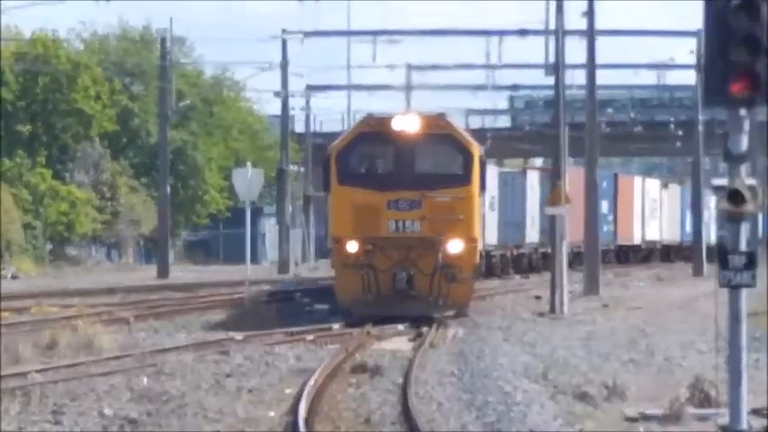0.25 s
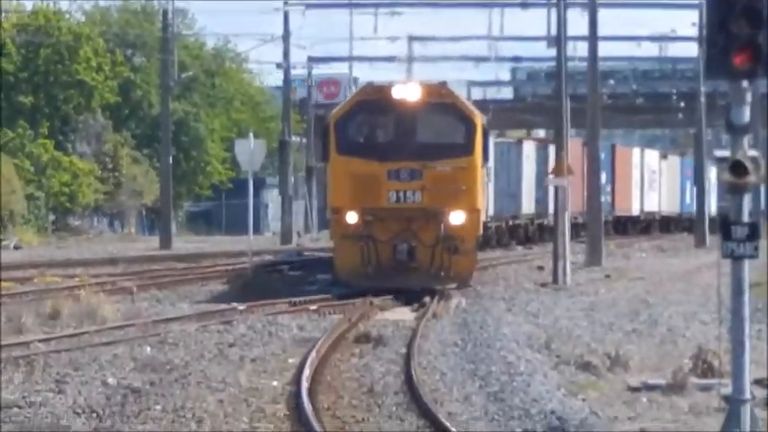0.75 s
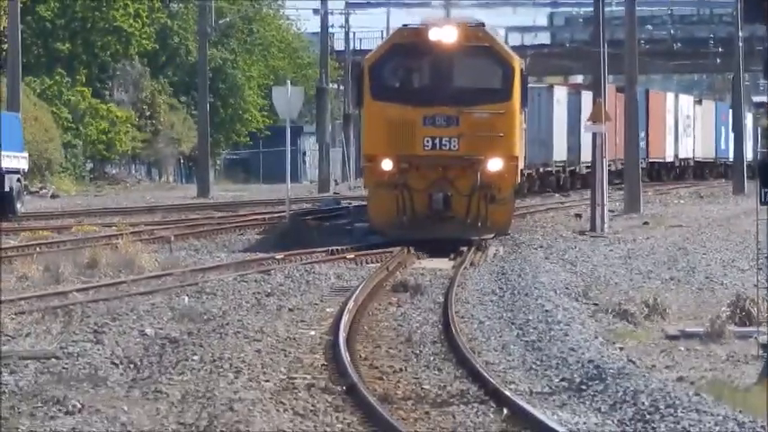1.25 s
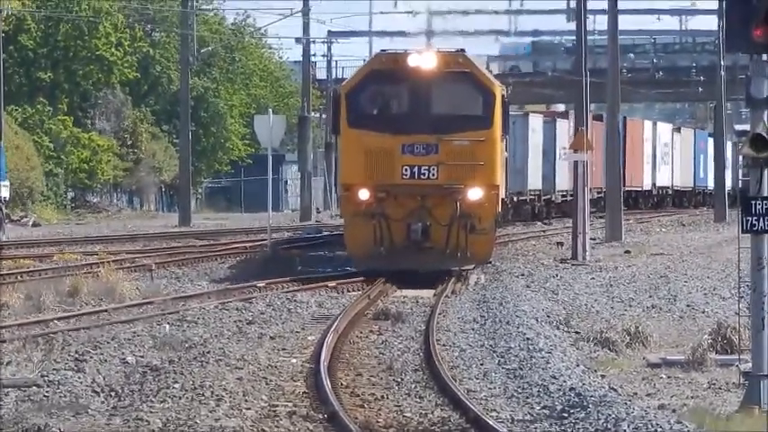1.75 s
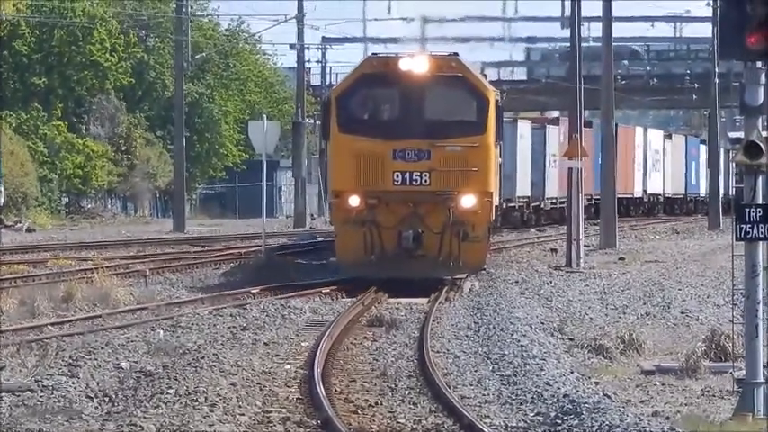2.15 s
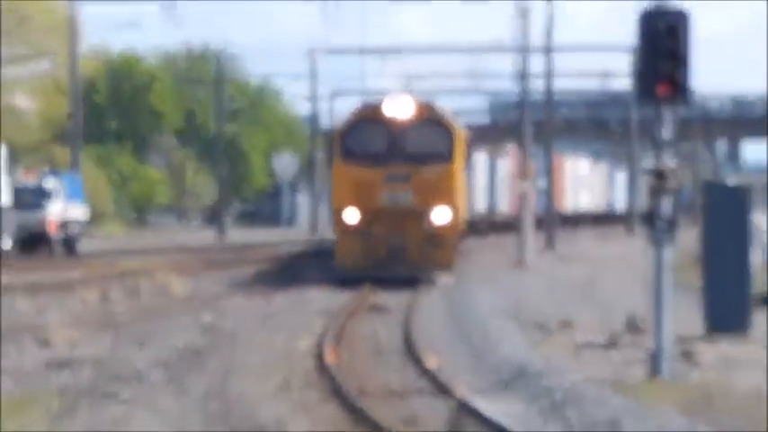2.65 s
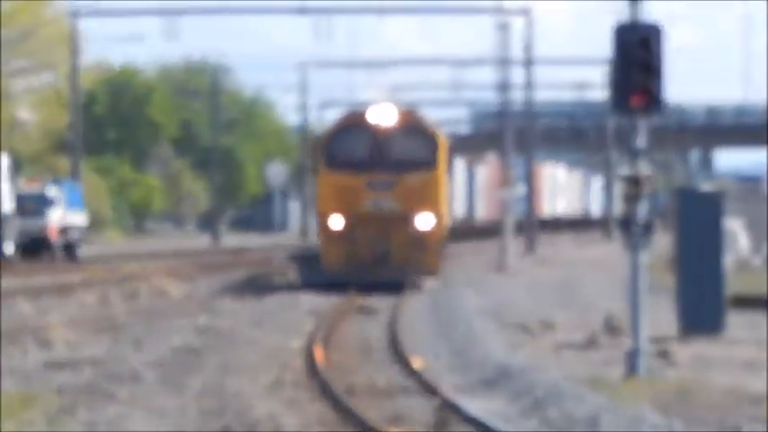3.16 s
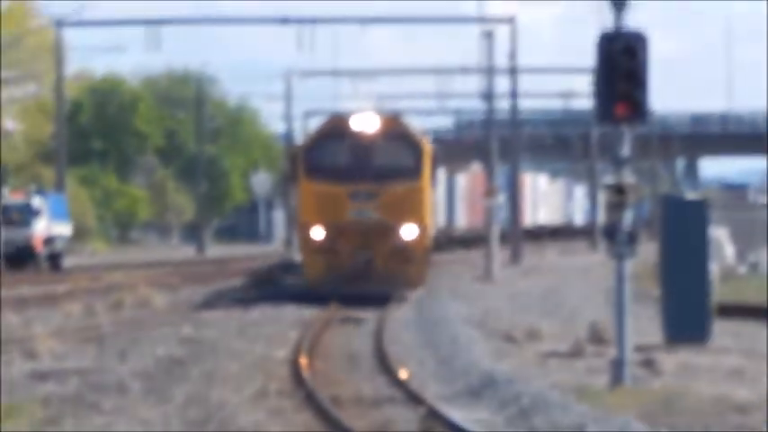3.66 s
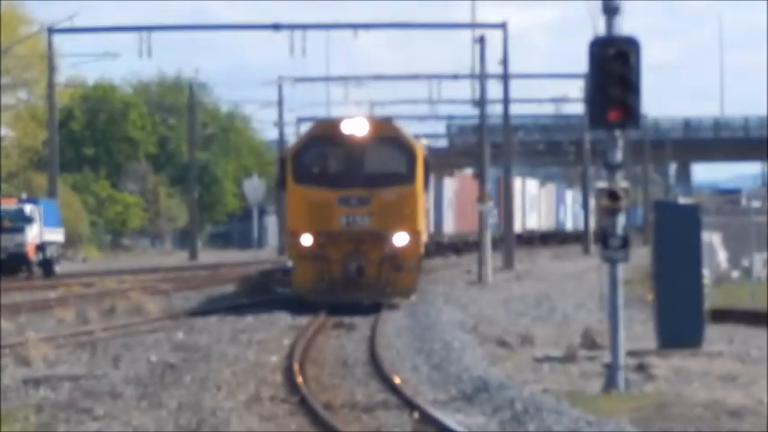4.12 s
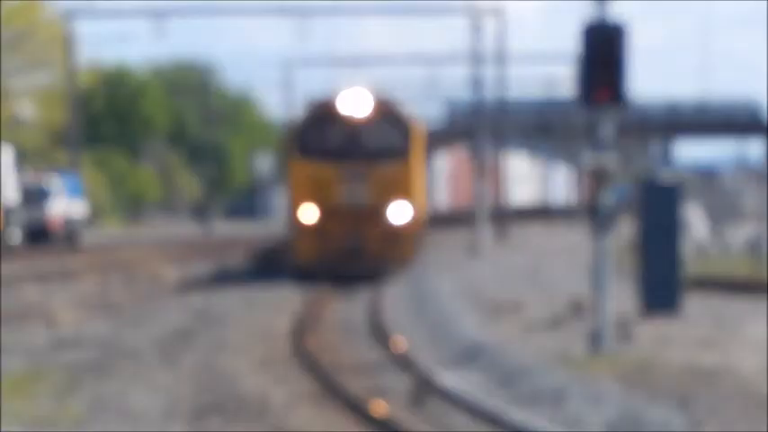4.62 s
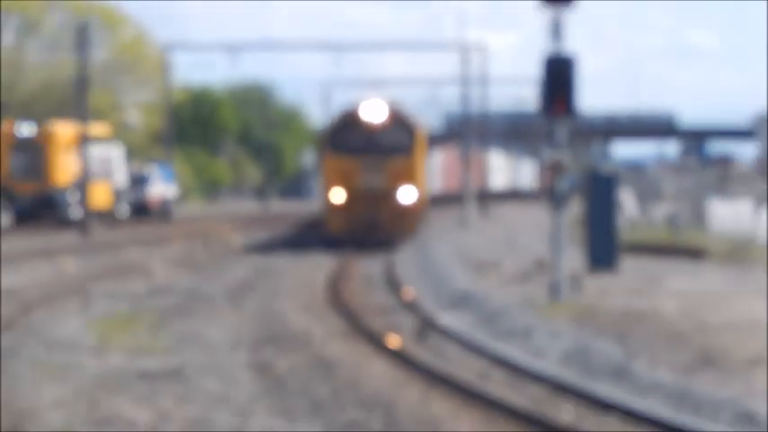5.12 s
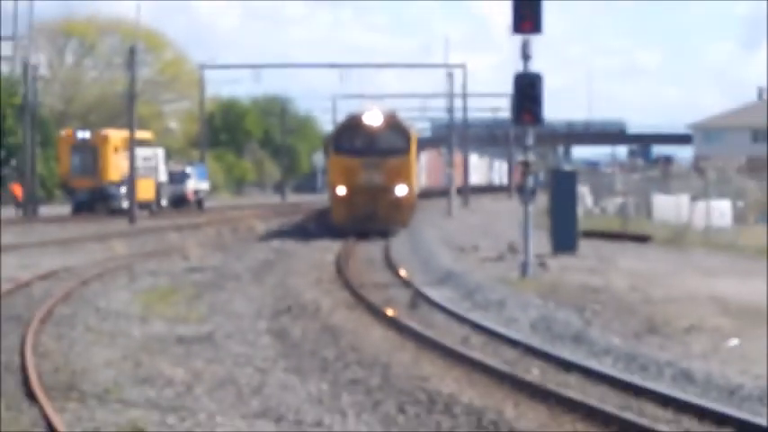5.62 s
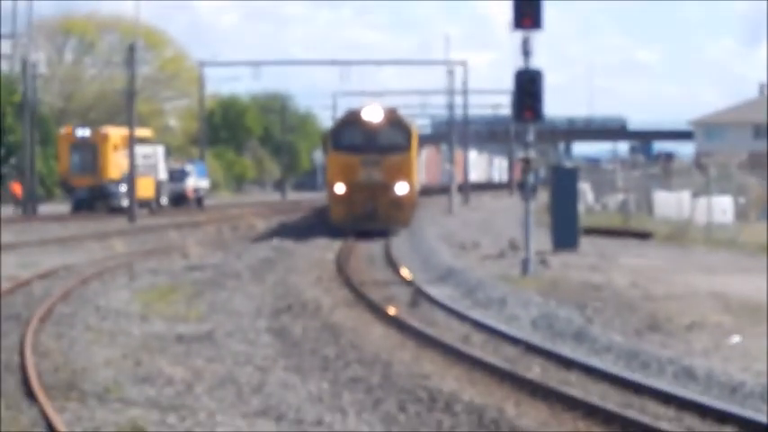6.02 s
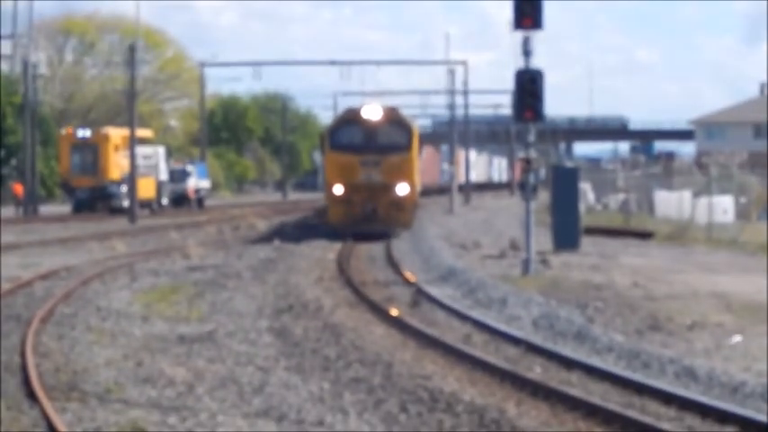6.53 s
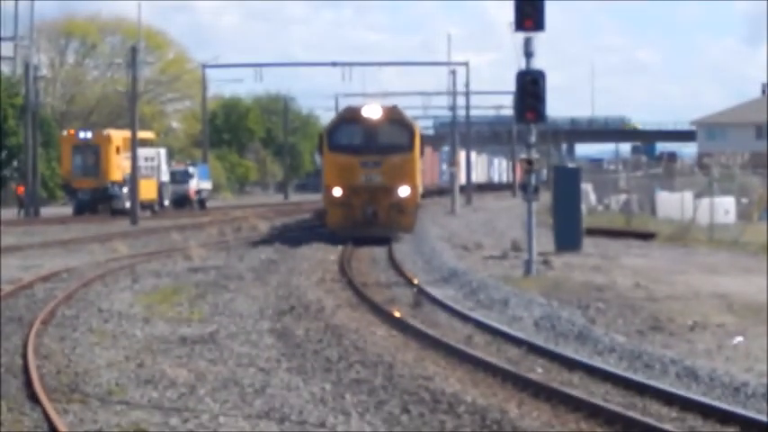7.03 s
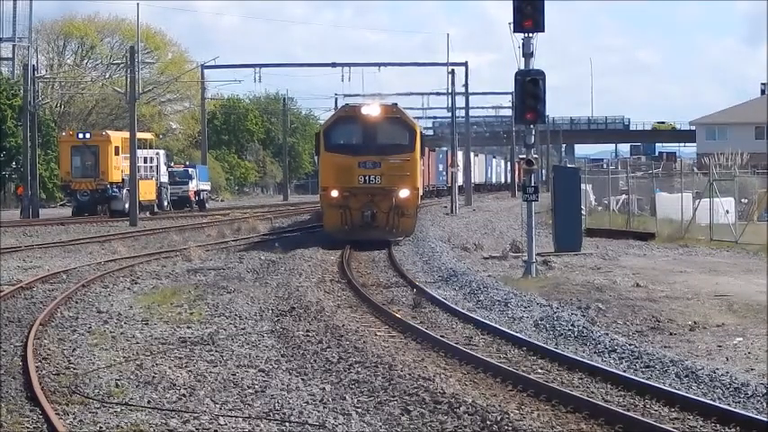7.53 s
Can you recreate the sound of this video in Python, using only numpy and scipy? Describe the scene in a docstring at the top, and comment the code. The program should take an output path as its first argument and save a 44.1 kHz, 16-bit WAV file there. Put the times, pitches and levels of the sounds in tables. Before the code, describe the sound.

Low, pulsing diesel engine rumble with a soft airy roar swells in a rail yard, punctuated by close plastic ticks and clacks from a handheld camera.

```python
"""A diesel locomotive revs up and hauls a freight train toward a small camera beside the yard.
Its two deep exhaust notes, orders 4 and 5 of the crankshaft, beat once per shaft turn over fainter orders.
Four bands of shaped random noise add growl, roar, hiss and air.
The camera's casing ticks, clacks and rustles close to its two microphone ports: brief impacts ring
its modes and gated noise makes the rustle. Thin squeaks, tones of jittering phase, pass twice."""
import sys
import numpy as np
from scipy import signal
from scipy.fft import rfft, irfft, next_fast_len
from scipy.io import wavfile
from scipy.ndimage import uniform_filter1d, map_coordinates

SR = 44100
rng = np.random.default_rng(int(sys.argv[2]) if len(sys.argv) > 2 else 0)


def unload_wav(signal):
    """Save mono or channel-first audio to the path in sys.argv[1] as 16-bit WAV at rate SR, clipped to [-1, 1]."""
    wavfile.write(
        sys.argv[1],
        SR,
        np.round(np.clip(np.atleast_2d(signal).T, -1, 1) * 32767).astype(np.int16),
    )


N = 343098

# Crankshaft speed as the engine revs up and settles: (time [s], shaft speed [Hz])
SHAFT_SPEED = [(0.0, 14.493), (0.7, 14.838), (1.4, 15.11), (2.1, 15.754), (2.8, 16.322), (3.5, 16.785),
               (4.1, 17.121), (4.8, 17.058), (5.6, 16.862), (6.5, 16.814), (7.78, 16.921)]


def amp(db):
    """Level to amplitude: 20 dB is a factor of ten."""
    return 10 ** (np.asarray(db) / 20)


def unit(x):
    """Normalization to an rms of 1."""
    return x / np.sqrt(np.mean(x ** 2) + 1e-20)


def along(points, hz):
    """Linear interpolation of (frequency [Hz], value) points on a logarithmic frequency axis."""
    f, v = np.transpose(points)
    return np.interp(np.log(hz + 1), np.log(f + 1), v)


def curves(rows):
    """Linear interpolation in time: one value per sample for each column after the time."""
    s, *cols = np.transpose(rows)
    return [np.interp(np.arange(N) / SR, s, c) for c in cols]


def wobble(rate):
    """Slow random modulation: a smooth curve through random knots, rate of them a second."""
    at = np.arange(0, N + 64, 64)
    knots = rng.standard_normal(int(N * rate / SR) + 5)
    return np.interp(np.arange(N), at, map_coordinates(knots, [at * rate / SR]))


def filtered(x, response):
    """Linear filtering: the spectrum of x times a complex response of frequency."""
    m = next_fast_len(N + SR // 2)
    return irfft(rfft(x, m) * response(np.fft.rfftfreq(m, 1 / SR)), m)[..., :N]


def note(hz, db, start):
    """Phase is the integral of frequency: a sine of moving pitch and rms level, start in turns."""
    return amp(db) * np.sqrt(2) * np.cos(2 * np.pi * (start + np.cumsum(hz) / SR))


def rush(spectrum, patchy_db):
    """Partly coherent noise: stereo, rms 1, with patches of random gain in time and frequency."""
    # Coherence of the two ports: (frequency [Hz], left-right correlation [0 to 1])
    coherence = [(60, 0.98), (200, 0.99), (430, 0.94), (650, 0.92), (860, 0.71), (1300, .54), (1900, 0.63),
                 (2800, 0.59), (5000, 0.2), (8600, .08), (13000, .2)]
    z = signal.stft(rng.standard_normal((2, N)), nperseg=512)[2]
    field = uniform_filter1d(rng.standard_normal(z.shape[1:]), size=5, axis=0)
    field = uniform_filter1d(field, size=12, axis=1)
    pair = signal.istft(z * amp(patchy_db * unit(field)), nperseg=512)[1][:, :N]

    def mid_side_response(hz):
        # mid power less side power gives the correlation, cos(2 * angle)
        angle = np.arccos(np.clip(along(coherence, hz), -1, 1)) / 2
        return amp(along(spectrum, hz)) * [np.cos(angle), np.sin(angle)]

    mid, side = filtered(pair, mid_side_response)
    return unit(np.array([mid + side, mid - side]))


def deep(order, db, start, shaft_hz):
    """Interference: a reflected path cancels a deep note, which fades and slips in phase."""
    # Cancellations: (middle [s], order, depth [dB], half width [s], phase slip [turns])
    fades = [(1.02, 5, 2.5, 0.079, 0.13), (1.31, 5, 7, 0.051, 0.216), (1.63, 5, 12, 0.2, 0.65),
             (1.66, 4, 18.5, 0.383, 1.034), (1.94, 5, 5.5, 0.051, 0.107), (2.6, 5, 10, 0.22, 0.287),
             (3.04, 5, 9.5, 0.13, 0.18), (3.37, 4, 12.0, 0.233, 0.361), (4.36, 5, 8.5, 0.08, -0.593),
             (6.4, 4, 14.5, 0.188, 0.44), (6.82, 5, 16, 0.2, 0.569), (6.95, 4, 6.5, 0.081, 0.15)]
    t = np.arange(N) / SR
    for s, faded_order, depth_db, half_s, slip in fades:
        if faded_order == order:
            db = db - depth_db / (1 + ((t - s) / half_s) ** 2)
            start = start + slip * 0.5 * (1 + np.tanh((t - s) / half_s))
    return note(order * shaft_hz, db, start)


def upper_order(order, db, shaft_hz):
    """A harmonic of the shaft under random modulation, lifted where it stands out clearly."""
    # Stretches where one order stands out: (middle [s], order, level before flutter [dB], half length [s])
    swells = [(.3, 13, -43.5, .5), (0.854, 14, -40.5, 0.23), (1.348, 13, -36.5, 0.22),
              (2.897, 18, -41, 0.28), (2.445, 13, -35.5, .5), (3.5, 20, -44, 0.38), (4.0, 8, -39.5, 0.59),
              (4.297, 11, -40.5, 0.37), (4.4, 16, -41.5, 0.58), (4.6, 12, -33.5, 0.28), (5.07, 7, -41, .35),
              (5.403, 13, -35, 0.21), (5.45, 16, -41, 0.24), (5.6, 8, -36, 0.95), (5.8, 11, -35.5, 0.57),
              (6.15, 13, -35, 0.34), (6.346, 12, -34, 0.53), (6.803, 7, -38, 0.3), (7.048, 8, -38, .4),
              (7.15, 12, -30, .45), (7.2, 20, -37.5, .35)]
    t = np.arange(N) / SR
    effort_db = 2.0 * (shaft_hz - shaft_hz.max())  # the engine sounds fuller as it revs up
    gain = amp(db + effort_db + 4.0 * wobble(3))
    for s, swelling_order, peak_db, half_s in swells:
        if swelling_order == order:
            span = slice(max(round((s - half_s) * SR), 0), round((s + half_s) * SR))
            swell = amp(peak_db) * np.cos(np.pi / 2 * (t[span] - s) / half_s)
            gain[span] = np.maximum(gain[span], swell)
    hz = order * shaft_hz + 0.804 * wobble(5)
    return gain * note(hz, 2.46 * wobble(12), rng.random())


def exhaust():
    """Harmonics of a rotating source: adjacent orders of the crankshaft beat at the shaft rate."""
    # Deep notes wavering as direct and reflected paths trade places, before the cancellations:
    # (time [s], 4th order level [dB], 5th order level [dB])
    boom_levels = [(0.0, -58, -28.8), (0.12, -52.0, -20.2), (0.35, -34.2, -18.5), (0.6, -30.6, -15.5),
                   (1.1, -23.5, -14.5), (2.15, -24.4, -10), (3.5, -22, -12.5), (3.85, -22, -15.5),
                   (4.3, -20, -27.5), (5.0, -21.5, -18), (5.8, -23, -12.5), (6.4, -21.5, -13.5),
                   (7.15, -20.5, -15.2), (7.5, -20.5, -12), (7.78, -21, -12.8)]
    # Starting phases: (4th order [turns], 5th order [turns])
    boom_phases = (0.075, 0.727)
    # Fainter orders: (multiple of the shaft speed, level at full revs before random fading [dB])
    faint_orders = [(3, -52), (6, -51), (7, -47), (8, -47), (9, -52), (10, -48), (11, -50), (12, -48),
                    (13, -46), (14, -52), (15, -51), (16, -50), (18, -53), (20, -54), (24, -54)]
    shaft_hz, = curves(SHAFT_SPEED)
    sound = np.zeros(N)
    for order, db, start in zip((4, 5), curves(boom_levels), boom_phases):
        sound += deep(order, db, start, shaft_hz)
    for order, db in faint_orders:
        sound += upper_order(order, db, shaft_hz)
    return sound


def roar():
    """Broadband noise in four randomly patchy bands: growl and hiss follow curves, the roar follows
    the revs and a little of the hiss, the air follows the hiss and grows."""
    # Levels of two bands: (time [s], growl level [dB], hiss level [dB])
    load_levels = [(0, -38, -48), (.4, -38, -52.5), (1.75, -35, -51.5), (2.23, -35, -46),
                   (2.45, -34.5, -47.5), (3.12, -32.5, -48.5), (3.49, -34.5, -49.5), (4.16, -30, -50),
                   (5.5, -35, -48.5), (6.13, -32, -49), (6.74, -31.5, -47), (7.2, -29.5, -49),
                   (7.78, -30.5, -48)]
    # Relative spectra of growl, roar, hiss and air: (frequency [Hz], spectral density [dB per Hz])
    growl_spectrum = [(15, -45.5), (27, -28), (45, -7.5), (80, 1), (105, -4), (130, -11.5), (165, -6),
                      (205, -2.5), (270, -4.5), (330, -5.5), (400, -16.5), (520, -25), (700, -68)]
    roar_spectrum = [(250, -19), (420, -4.5), (486, -7), (711, -3.5), (987, -9), (1270, -5), (1520, -11.5),
                     (2040, -9.5), (2340, -15), (2500, -22), (2600, -19), (3380, -54.5), (5720, -120)]
    hiss_spectrum = [(1500, -42.5), (2300, -4), (2600, -3.5), (3050, -2.5), (3300, -6.5), (3750, -9),
                     (4000, -13.5), (4500, -14), (5200, -16), (6500, -38.5)]
    air_spectrum = [(3500, -41.5), (4800, -6.5), (5900, 2.5), (6600, -0.5), (7400, -2.5), (8300, -5),
                    (9200, -8), (10200, -11), (11500, -20.5), (13000, -26), (14000, -30.5), (15700, -39.5)]
    growl_db, hiss_db = curves(load_levels)
    shaft_hz, = curves(SHAFT_SPEED)
    t = np.arange(N) / SR
    growl = amp(growl_db + 0.3 * wobble(16)) * rush(growl_spectrum, patchy_db=1.5)

    roar_db = -36 + 0.98 * (shaft_hz - shaft_hz.max())  # falls 0.98 dB per Hz below full revs
    roar_db += 0.14 * (hiss_db - hiss_db.mean())  # follows the hiss a little
    middle = amp(roar_db + 0.22 * wobble(8)) * rush(roar_spectrum, patchy_db=0.41)
    # the roar below about 850 Hz grows at the very end
    surge_s, surge_db_per_s = 7.1, 6.5
    lower = filtered(middle, lambda hz: 1 / (1 + (hz / 850) ** 6))
    middle += (amp(surge_db_per_s * np.maximum(t - surge_s, 0)) - 1) * lower

    flutter = wobble(10)  # shared by hiss and air
    hiss = amp(hiss_db + 1.1 * flutter) * rush(hiss_spectrum, patchy_db=1.27)
    air_db = hiss_db - 15.5 + 0.5 * t  # gains 0.5 dB per second as the train draws near
    air = amp(air_db + 0.84 * flutter) * rush(air_spectrum, patchy_db=1.7)
    return growl + middle + hiss + air


def train():
    """Interaural-style differences: the right port leads, and the balance varies with pitch."""
    # Balance of the ports: (frequency [Hz], left minus right [dB])
    port_balance = [(800, 0), (1300, -1.5), (2150, -3.5), (3400, -2), (5200, -2), (6500, 0), (8600, 1),
                    (11000, -1)]
    lag_s = 0.0001  # lag of the left port, shrinking in the deep bass

    def half(hz):
        phase = np.pi * hz * lag_s * hz / (hz + 120)
        return amp(along(port_balance, hz) / 2) * np.exp(-1j * phase)

    return filtered(exhaust() + roar(), lambda hz: np.array([half(hz), 1 / half(hz)]))


def contacts():
    """Impact excitation: every contact in the casing as (time [s], level [dB], brightest [Hz])."""
    # Ticks; a bright one and a catch lead each clack: (time [s], level [dB], brightest frequency [Hz])
    ticks = [(.1273, -35.5, 4500), (.136, -37.5, 3980), (.1608, -32, 1520), (.167, -28.5, 3540),
             (.171, -30.5, 2030), (2.1467, -34, 8400), (2.1514, -28, 5940), (2.250, -32, 6080),
             (2.288, -30, 3290), (2.292, -31.5, 4550), (2.8866, -34, 4960), (2.926, -31, 5860),
             (4.26, -26.5, 4270), (4.6103, -31, 3880), (4.6448, -27.5, 3520), (5.017, -48.5, 7860),
             (5.0468, -47, 10370), (5.0814, -33.5, 8440), (5.7274, -46.5, 6060), (5.747, -46.5, 6900),
             (5.762, -43, 5970), (5.7762, -38, 4900), (6.953, -49.5, 8400)]
    # Low clacks of a camera control:
    # (time [s], level [dB], brightest frequency [Hz], rattle reference level [dB])
    clacks = [(.174, -24, 1280, -27), (2.301, -19.5, 1940, -35), (2.9301, -24.5, 1300, -27),
              (4.65, -19, 2860, -23.5)]
    # Rattle after a clack: (delay [s], level re rattle reference [dB], frequency ratio to the clack)
    rattle_steps = [(.003, 1, 0.52), (.008, -6, 0.98)]
    rows = list(ticks)
    for s, db, hz, rattle_db in clacks:
        rows.append((s, db, hz))
        for later, under_db, ratio in rattle_steps:
            rows.append((s + later, rattle_db + under_db, hz * ratio))
    return rows


def casing_ticks():
    """Modal ringing: each contact excites the modes near its brightest pitch, differently at each port."""
    # Modes of the casing: (frequency [Hz], relative level [dB])
    casing_modes = [(650, -0.5), (900, -2.5), (1250, -0.5), (1600, 0), (1950, 3), (2350, 5.5), (3000, 6),
                    (3600, 2.5), (4500, -3), (5200, -10), (6000, -6), (7000, -5.5), (8300, -6), (10300, -2),
                    (11500, -6), (12600, -10)]
    out, t = np.zeros((2, N + SR)), np.arange(SR // 30) / SR
    hz, level = np.transpose(casing_modes)
    for s, db, bright_hz in contacts():
        pan_db = 1.5 * rng.standard_normal()
        draw = rng.standard_normal((3, len(hz), 2))
        reach_db = level - 11 * np.abs(np.log2(hz / bright_hz))  # 11 dB less per octave away
        phase = 6 * draw[0, :, :1] + 0.98 * draw[1]
        # loose parts blur every mode
        jitter = uniform_filter1d(rng.standard_normal((len(hz), 1, len(t))), size=5)
        blur = 0.0036 * np.sqrt(hz)[:, None, None] * np.cumsum(jitter, axis=2)
        modes = np.sin(2 * np.pi * hz[:, None, None] * t + phase[..., None] + blur)
        mode_gain = amp(reach_db[:, None] + 3.9 * draw[2])[..., None]
        ring = unit(np.sum(mode_gain * modes, axis=0))
        # time to fall 60 dB: 14 ms at 4 kHz, longer for duller contacts
        t60_s = np.clip(0.014 * (4000 / bright_hz) ** 0.3, 0.002, 0.05)
        shape = amp(-60 * t / t60_s) * (1 - np.exp(-t / 0.00017))
        port_gain = amp(db + pan_db * np.array([[0.5], [-0.5]]))
        out[:, round(s * SR):][:, :len(t)] += port_gain * shape * ring
    return out[:, :N]


def whir():
    """Amplitude-gated friction noise: finger rubs and the zoom drive, rising quickly and fading."""
    # Short rubs of a finger and longer whirs of the zoom drive: (start [s], length [s], level [dB])
    rustles = [(0.123, .065, -56), (2.115, 0.049, -60), (2.254, .05, -64), (2.3, 0.46, -68.5),
               (2.889, .06, -61), (4.223, .04, -63), (4.61, 0.056, -62), (4.654, .4, -69),
               (5.0, .07, -68.5), (5.72, .08, -66)]
    # Relative spectrum of the rustle: (frequency [Hz], spectral density [dB per Hz])
    rustle_spectrum = [(2500, -31), (4000, -2), (7500, -2.5), (10000, -2), (12000, -6), (15000, -24)]
    gain = np.zeros(N)
    for s, length, db in rustles:
        u = np.linspace(0, 1, round(length * SR))
        gain[round(s * SR):][:len(u)] += amp(db) * np.sqrt(np.sin(np.pi * u ** 0.7).clip(0))
    return gain * rush(rustle_spectrum, patchy_db=2.0)


def squeaks():
    """Phase diffusion: a random walk of phase widens each faint treble tone into a narrow band."""
    # Thin squeaks: (start [s], length [s], frequency [Hz], bandwidth [Hz], level [dB])
    squeak_tones = [(6.35, 0.082, 9150, 350, -61.5), (6.361, .045, 12440, 249, -66.5),
                    (6.366, .04, 14030, 404, -78.5), (6.401, .045, 9300, 40, -59.5),
                    (6.625, 0.1, 8380, 30, -63.5)]
    out = np.zeros((2, N))
    for s, length, hz, width_hz, db in squeak_tones:
        t = np.arange(round(length * SR)) / SR
        jitter = np.cumsum(rng.standard_normal(len(t))) * np.sqrt(2 * np.pi * width_hz / SR)
        swell = amp(db) * np.sqrt(np.sin(np.pi * t / length))
        out[:, round(s * SR):][:, :len(t)] += swell * np.sin(2 * np.pi * hz * t + jitter)
    return out


def scene():
    """Superposition of train, casing ticks, rustle and squeaks."""
    return train() + casing_ticks() + whir() + squeaks()


def record(dry):
    """Band limiting: the camera cuts narrow notches and passes nothing from 15.8 kHz up."""
    # Narrow cuts: (centre [Hz], width [Hz], share of amplitude removed [0 to 1])
    narrow_cuts = [(2500, 70, .8), (4000, 70, .45), (5000, 90, .7), (7500, 90, .7), (10000, 90, .65)]

    def response(f):
        gain = (f < 15800).astype(float)
        for hz, width_hz, share in narrow_cuts:
            gain *= 1 - share / (1 + (2 * (f - hz) / width_hz) ** 2)
        return gain

    return filtered(dry, response)


dry = scene()
out = record(dry)
unload_wav(out)
```